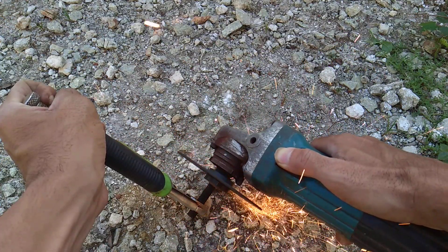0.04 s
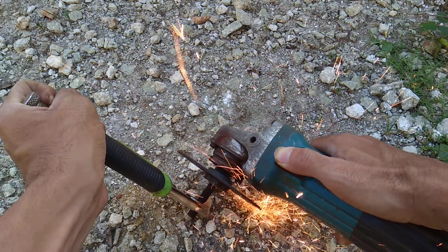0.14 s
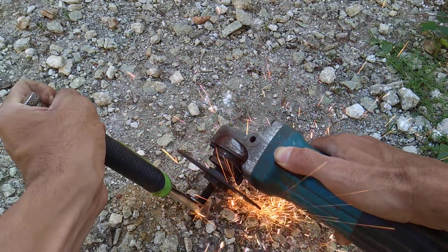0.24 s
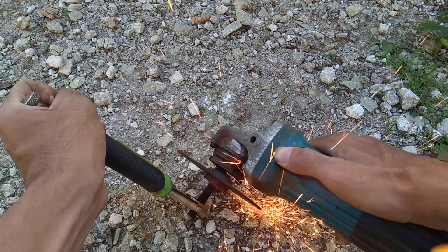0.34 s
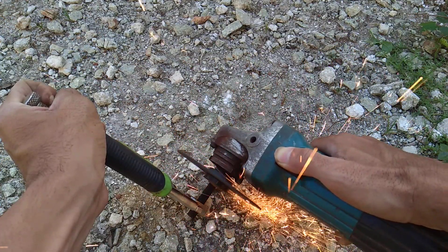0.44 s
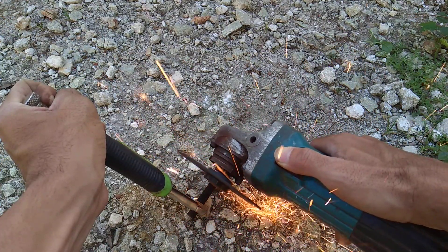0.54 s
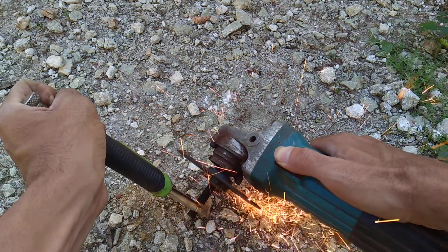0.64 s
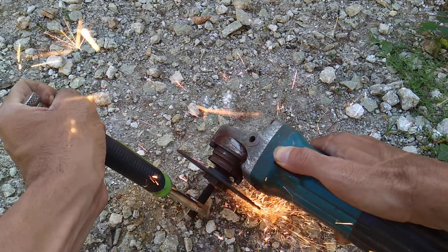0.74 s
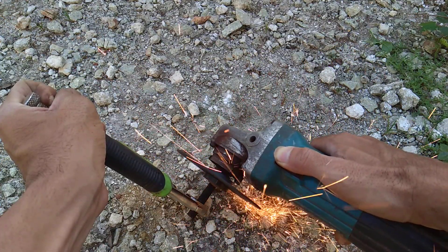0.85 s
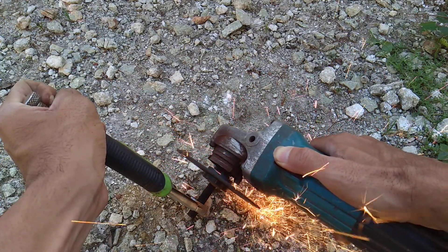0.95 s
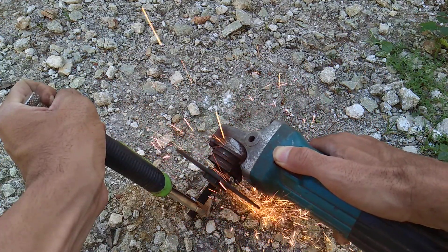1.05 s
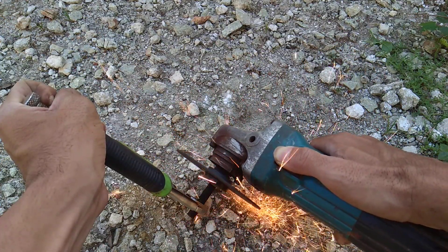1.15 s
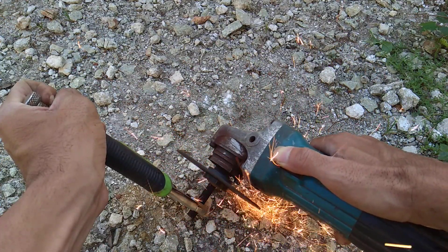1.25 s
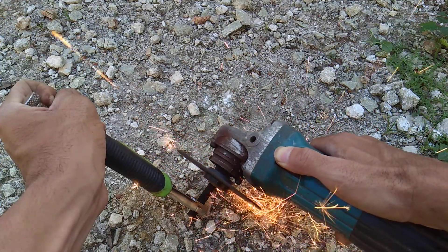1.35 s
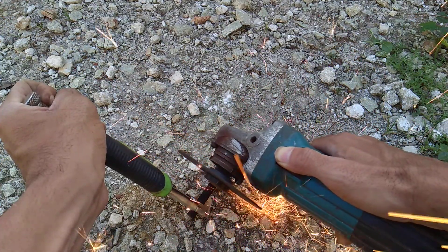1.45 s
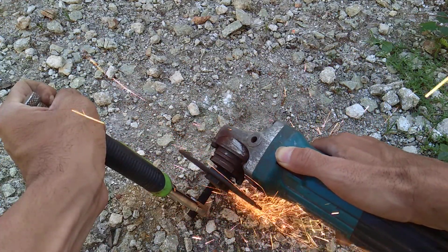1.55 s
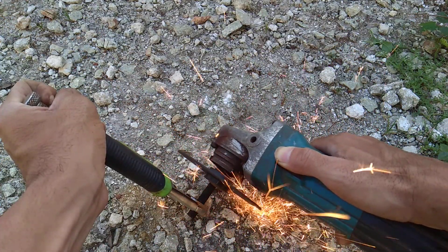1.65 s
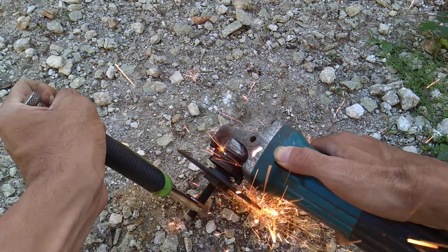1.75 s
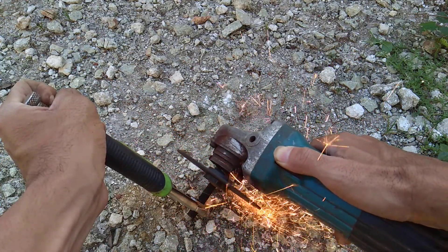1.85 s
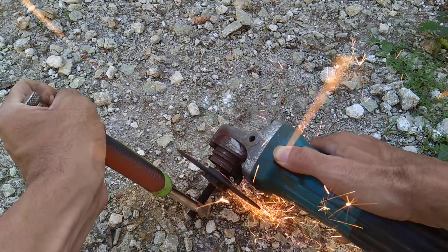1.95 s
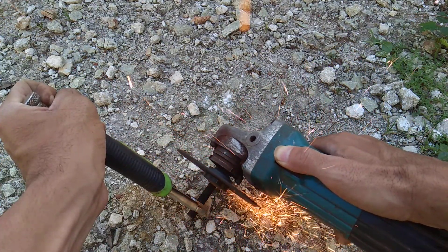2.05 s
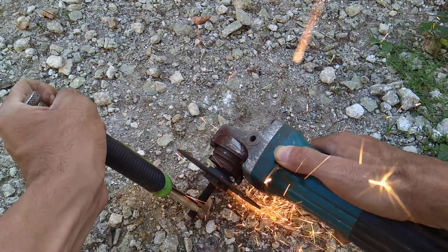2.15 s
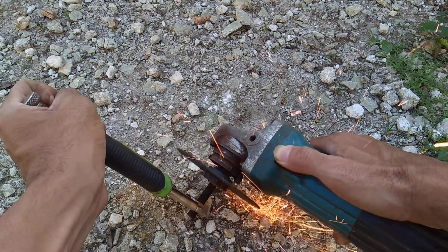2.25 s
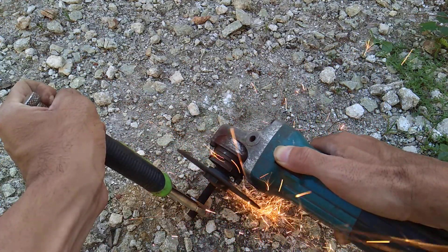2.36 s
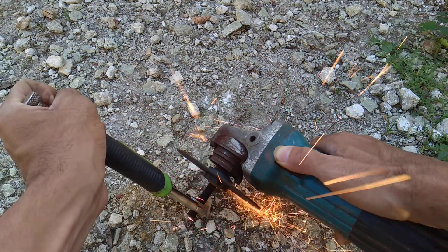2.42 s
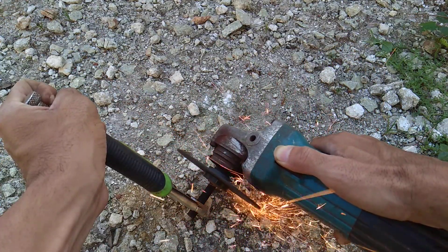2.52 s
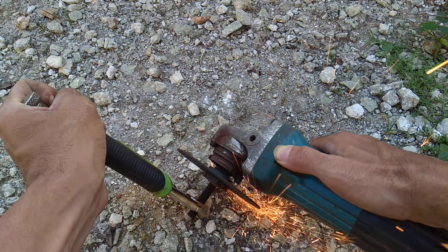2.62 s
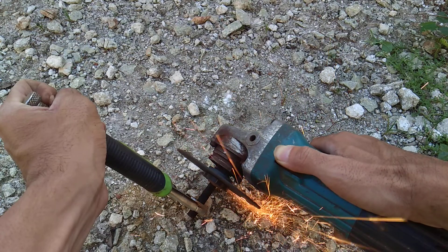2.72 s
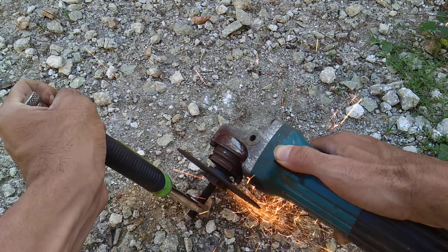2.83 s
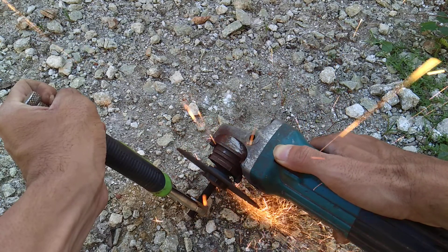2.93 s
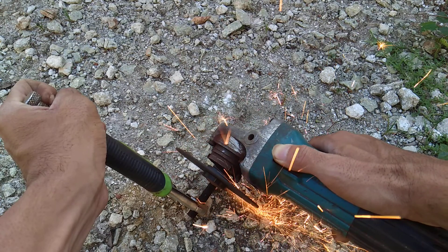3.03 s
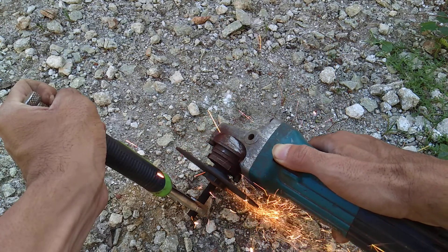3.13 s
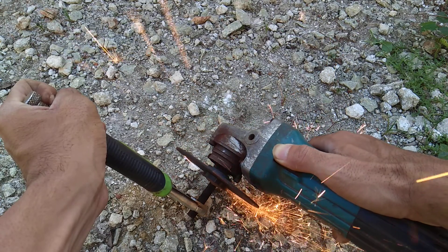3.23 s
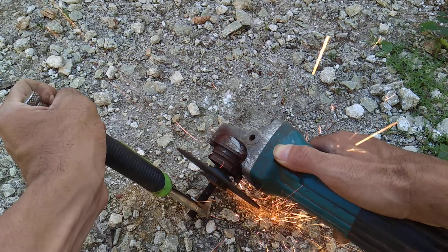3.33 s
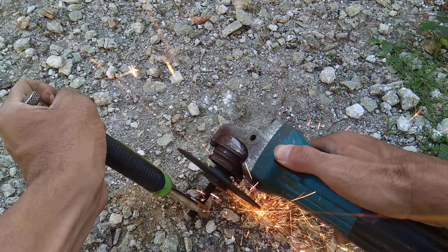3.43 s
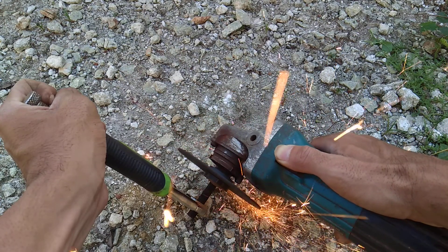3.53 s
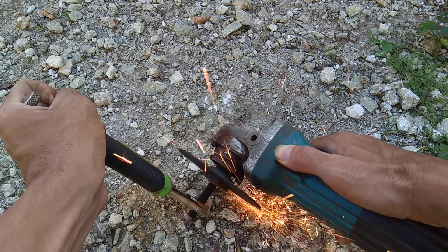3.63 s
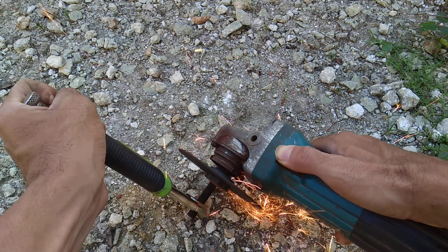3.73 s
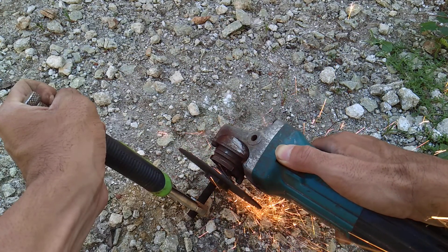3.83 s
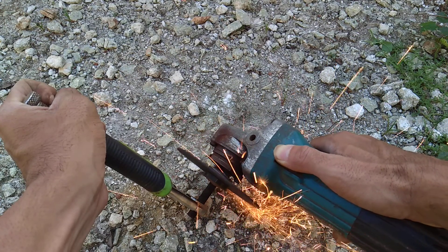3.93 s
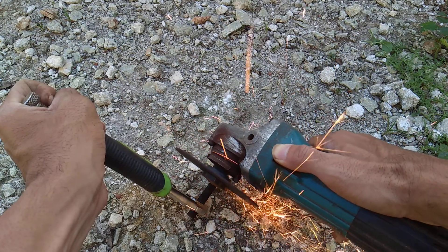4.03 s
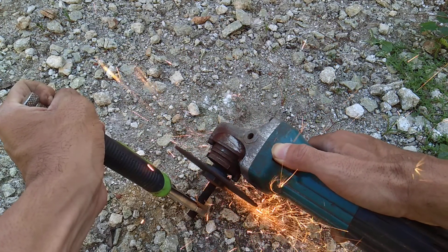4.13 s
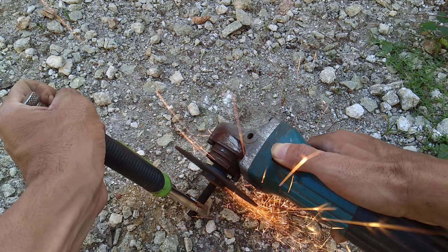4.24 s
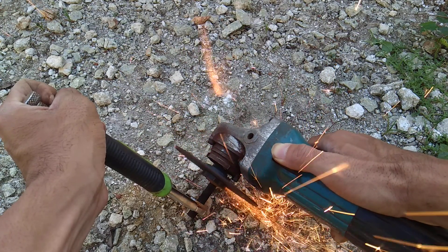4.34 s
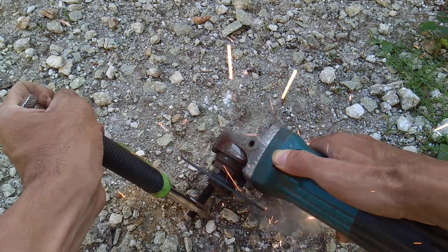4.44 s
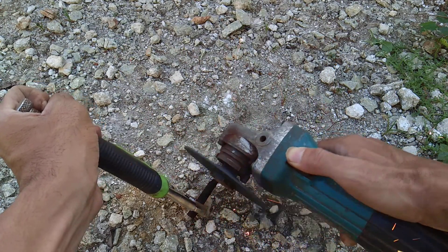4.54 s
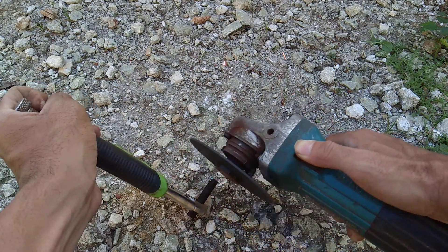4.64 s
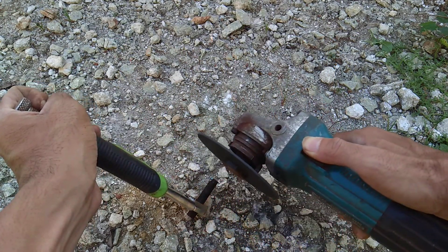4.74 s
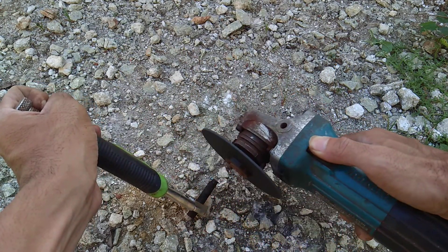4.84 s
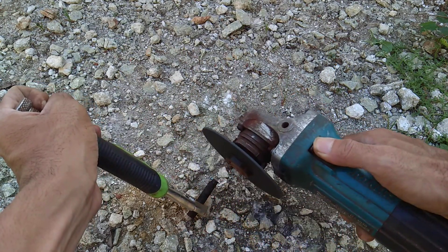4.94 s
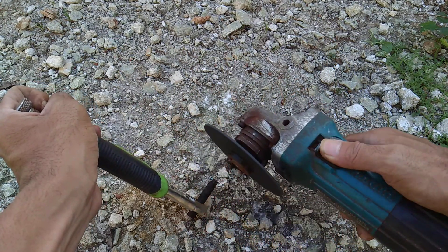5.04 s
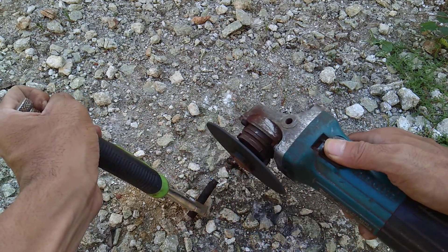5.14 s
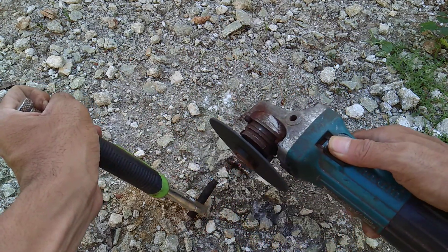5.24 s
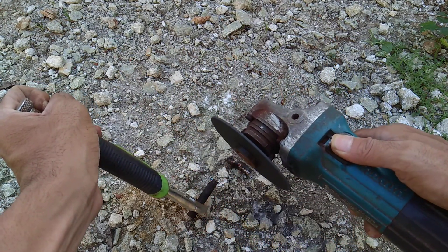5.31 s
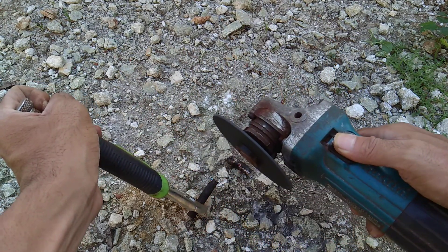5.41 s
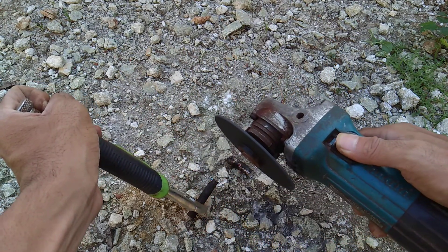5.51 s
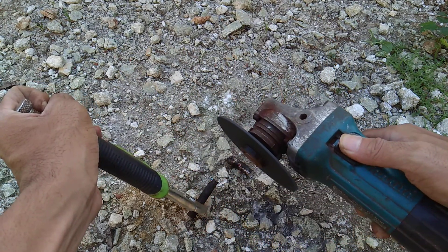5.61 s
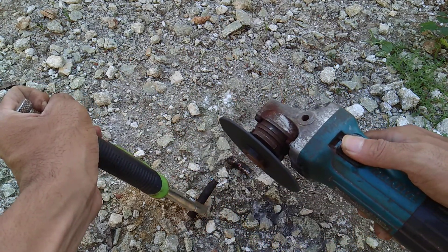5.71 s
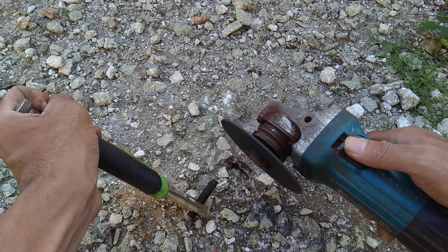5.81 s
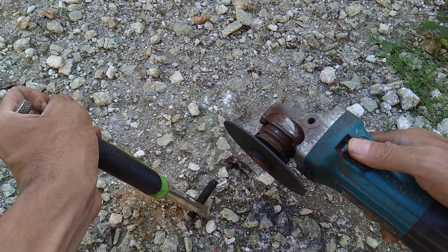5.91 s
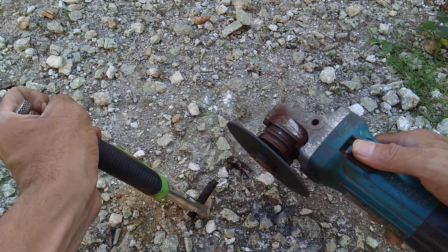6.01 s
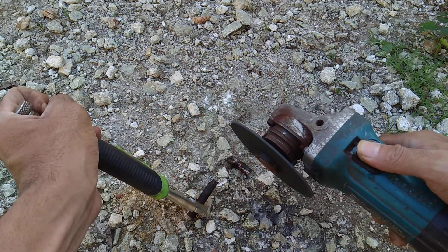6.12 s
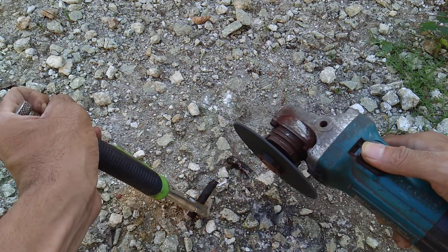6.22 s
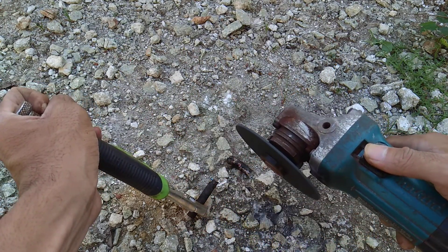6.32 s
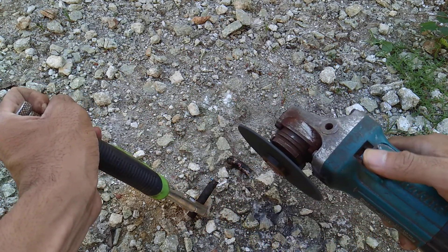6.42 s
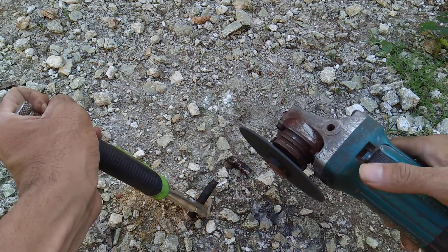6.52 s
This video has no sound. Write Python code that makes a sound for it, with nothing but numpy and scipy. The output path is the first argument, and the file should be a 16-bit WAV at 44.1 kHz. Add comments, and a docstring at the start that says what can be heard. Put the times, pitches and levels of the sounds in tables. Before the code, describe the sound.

An angle grinder cuts a steel nut with harsh, bright, pulsing grinding, then lifts off, races free, and whines down with rattling gears outdoors.

```python
"""An angle grinder cuts a steel nut on a rod, outdoors on gravel: grit strikes ring the rod and wheel and hiss.
The cut pulses with each wheel turn and with the mains; the wheel catches now and then, later skips, then lifts off.
The motor races free, is switched off, and coasts down: fan whine, rotor hum and air rush fall with its speed.
Gear teeth knock and rattle in the coast; the sounds are sines, and noise shaped by filters that ring.
A faint low background runs throughout, and both channels are alike."""
import sys
import numpy as np
from scipy import signal
from scipy.fft import rfft, irfft, next_fast_len
from scipy.io import wavfile
from scipy.ndimage import uniform_filter1d, map_coordinates

SR = 44100
rng = np.random.default_rng(int(sys.argv[2]) if len(sys.argv) > 2 else 0)


def to_wav(sig):
    """Store sig (one row per channel, or 1-D mono) as 16-bit WAV at the path in sys.argv[1].

    Samples outside -1..1 are clipped; the rate is SR.
    """
    pcm = np.clip(np.atleast_2d(sig), -1, 1) * 32767
    pcm = np.round(pcm).astype(np.int16)
    wavfile.write(sys.argv[1], SR, pcm.T)  # frames by channels


N = 289737
T = np.arange(N) / SR  # time of each sample [s]
LIFT_S, OFF_S = 4.475, 5.015  # the wheel leaves the nut; the motor is switched off
WHEEL_RATIO = 10 / 37  # pinion teeth over crown teeth
FAN_BLADES, MOTOR_SLOTS, MAINS_PULSE_HZ = 31, 12, 100

# Steady pressure of the cut: (time [s], ring of the rod [dB], grit hiss [dB])
CUT_LEVELS = [(0, -39.5, -34.5), (.45, -36, -35.5), (.98, -38.5, -36), (1.03, -39, -36), (1.45, -41, -35.5),
              (1.75, -40, -35.5), (2.4, -41.5, -37), (2.9, -40, -36), (3.1, -40.5, -35),
              (3.5, -40.5, -36.5), (3.9, -40.5, -36), (4.3, -41.5, -35.5), (4.39, -39.5, -37.5),
              (4.42, -48, -39), (4.5, -50.5, -43)]
# The wheel digs in for a moment: (time [s], gain of the ring [dB], length [s])
FLARES = [(0.162, 4, 0.029), (.36, 1, 0.0065), (.63, 9, 0.0057), (0.7, 3.5, 0.021), (0.834, 3, 0.036),
          (.925, 6.5, 0.0075), (.938, -1, .003), (1.343, 3.5, 0.015), (1.565, 7, 0.0087),
          (1.615, 3.5, 0.026), (2.538, 9, 0.0047), (3.946, 7, 0.021), (4.362, 6.5, 0.024),
          (4.458, 13.5, 0.013)]
FLARE_HISS, WAVER_DB, WAVER_HZ = 0.29, 1.5, 35.04  # share of flare and waver that reaches the hiss; random waver
# The wheel skips on the nut, about every second turn: (time [s], strength against the steady cut [dB])
BOUNCES = [(3.917, 11), (3.935, 9), (3.947, -8), (3.957, 1), (4.046, 7), (4.06, 2), (4.076, 7), (4.09, 1),
           (4.101, -6), (4.116, 3), (4.14, 7), (4.153, 8), (4.168, 9), (4.188, 1), (4.203, 6), (4.217, 0),
           (4.231, -13), (4.256, 2), (4.269, 2), (4.282, -7), (4.299, 6), (4.313, 8), (4.33, 1), (4.342, 1),
           (4.36, 2), (4.373, 9), (4.386, 6), (4.396, -1), (4.413, 0), (4.429, 10), (4.438, 0), (4.447, 0),
           (4.453, -1), (4.461, 6), (4.476, 0)]
BOUNCE_S, SKIP_FROM_S, SKIP_DB = 0.0019, 4.4, -6  # half length of a bounce; contact slackens between bounces
# Ways the rod, nut and wheel ring: (pitch [Hz], width [Hz], level [dB])
ROD_MODES = [(2543, 190, -11.5), (2735, 86, -0.5), (2789, 75, -0.5), (2960, 240, -3), (3245, 470, -10.5),
             (3902, 145, -6), (4360, 330, -10), (5173, 224, -4), (5566, 165, -7), (6020, 67, -5),
             (6744, 150, -3.5), (7570, 120, -10.5), (7850, 210, -7), (8665, 200, -1.5), (8865, 200, 0),
             (9170, 170, -7.5), (9560, 170, -4), (10350, 130, -7), (10610, 630, -3), (11040, 230, 0.5),
             (12400, 420, -7.5), (13230, 250, -8), (13600, 300, -7.5), (13860, 260, -5), (14330, 260, -7),
             (15400, 500, -9)]
SPLIT_HZ = 3600  # border between the low and the high modes
# Dull ringing of the long rod: (pitch [Hz], width [Hz], level [dB])
HANDLE_MODES = [(1150, 200, -2.5), (1437, 180, -1), (1705, 166, 0), (1987, 150, 0), (2254, 93, -2)]
HANDLE_DB = -16  # level against the hiss
# Colour of the grit hiss: (pitch [Hz], level per Hz [dB])
GRIT_COLOUR = [(200, -19), (700, -15.5), (1500, -13), (2250, -19), (3600, -11), (5500, -4), (9000, -0.5),
               (12000, -6.5), (12750, -7), (13500, -3), (14800, -7), (16000, -9.5)]
# Scars on the wheel face sing at these multiples of the wheel speed: (order [per turn])
SCAR_ORDERS = (19, 20, 21, 24, 26, 28, 30, 36, 38, 53, 65, 79)
# Moments of wear: (time [s])
WEAR_TIMES = (.5, 1.6, 2.6, 3.8)
# One row a scar order, one column a moment of wear: (level against the ring [dB], four times)
SCAR_LEVELS = [(-12.5, -12, -10.5, -12), (-26, -23, -6, -15), (-16, -23, -16, -7.5), (-17, -23, -24, -19),
               (-36.5, -11.5, -33, -35), (-32, -23, -22, -23), (-18, -9.5, -31, -33), (-27, -20, -25, -32),
               (-34, -28, -19, -19), (-29.5, -19, -17, -12), (-29, -15, -7, -13), (-11, -27, -26, -22)]
FACE_DB, FACE_WEAR_HZ = -7, 2.49  # grit pattern that returns every turn, and how fast it wears away
# The cut shakes the tool body: (pitch [Hz], level per Hz [dB])
RUMBLE_COLOUR = [(60, -3), (150, -3), (320, 7), (450, -5), (650, -7), (850, -14)]
RUMBLE_DB = -63
# The wheel catches an edge: (time [s], level before shaping [dB], pitch [Hz], width [Hz], length [s])
SNAGS = [(0.456, -45.5, 1300, 250, 0.034), (1.009, -43, 1470, 300, 0.04), (1.615, -37.5, 1930, 300, 0.013),
         (1.833, -43, 1710, 300, 0.043), (2.394, -47, 990, 200, 0.019), (3.767, -39.5, 1790, 400, 0.031),
         (3.924, -35, 1770, 500, 0.014), (3.93, -51, 507, 200, 0.022), (4.023, -48, 804, 200, 0.021),
         (4.057, -28, 7050, 1400, 0.034), (4.443, -29.5, 5350, 900, 0.014), (4.441, -26, 11250, 600, .009),
         (4.444, -29, 13800, 900, 0.009), (4.44, -30, 7940, 700, 0.0074), (4.441, -52, 120, 200, 0.017),
         (4.455, -50.5, 231, 160, 0.02), (4.56, -63, 80, 60, .04), (4.471, -31, 6000, 5060, 0.005)]
# Single hard grains knock the rod: (time [s], blow [dB])
PINGS = [(.158, 2), (0.628, 3), (.687, 10), (0.9972, 19), (1.056, 1), (3.935, 13)]

# Motor shaft under load, until the hand eases off: (time [s], turns per second [Hz])
LOADED_SPEED = [(0, 489.8), (.55, 491.3), (.75, 489.9), (.9, 490.8), (1.03, 487.7), (1.2, 488.9),
                (1.65, 489.8), (1.95, 493.3), (2.1, 496.5), (2.25, 496.8), (2.55, 502), (2.85, 504.4),
                (3.15, 504.3), (3.6, 506.9), (3.75, 509), (4.44, 513.4)]
FREE_HZ, SPIN_UP_S = 594.7, 0.675  # speed without load, and the time constant towards it
FRICTION_HZ_PER_S, FAN_DRAG = 60.75, 4.972e-4  # coasting loses friction + drag * speed ** 2 each second
# Hum of the unbalanced rotor against shaft speed: (turns per second [Hz], level [dB])
HUM_LEVELS = [(320, -57), (345, -53.5), (372, -48.5), (400, -52), (430, -54), (478, -56), (490, -56),
              (500, -53.5), (509, -53), (518, -62), (560, -60.5)]
# Fan whine against its own pitch: (pitch [Hz], level [dB])
WHINE_LEVELS = [(9800, -60), (10100, -62), (10500, -62), (10800, -64), (11100, -57), (11550, -64),
                (11950, -52), (12250, -62), (12650, -56), (13000, -42), (14000, -47), (14400, -37),
                (14650, -38), (15000, -45.5), (15170, -51), (15400, -54.5), (15600, -63), (15720, -55),
                (15900, -60)]
# Pressing on the nut damps the hum; the whine has its own level: (time [s], hum gain [dB], whine gain [dB])
GRIP = [(0, -8, 2), (.98, -7.5, 2), (1.1, -8, -3), (2.2, -9.5, 0), (3.7, -11, 2), (4.5, -4, 0),
        (5.0, 3.5, 0)]
WHEEL_HUM_DB, SLOT_DB = -75, -52.5  # wheel hum at 520 shaft turns a second; slot tone at full current
# Gear mesh and neighbours of the slot tone: (order [per shaft turn])
SHAFT_ORDERS = 4, 10, 11, 13
# Their levels at full current, one each: (level [dB])
SHAFT_LEVELS = -63.5, -65, -59, -68
# Ways the housing rings: (pitch [Hz], width [Hz], level [dB])
CASE_MODES = [(542, 78, 2.5), (750, 54, -3), (464, 83, -12), (261, 14, -3.5)]
# Tones that ring the housing, wheel orders and their sums with the shaft: (order [per wheel turn])
CASE_ORDERS = (4, 5, 4.7, 2.7)
# Their levels going into the housing, one each: (level [dB])
CASE_LEVELS = (-74, -66, -67, -68.5)
# These tones come and go, one list an order: (time [s], gain [dB], length [s])
CASE_SWELLS = [
    [],
    [(5.62, -6, .04), (5.76, 7, .07), (5.9, -6, .03), (6.0, 1, 0.064), (6.35, -7, .15)],
    [(5.58, 3, 0.028), (5.67, 6, .04), (5.88, 7, .03), (6.3, 10, .11)],
    [(6.15, 7, .12)],
]
# The housing buzzes roughly: (time [s], gain [dB], length [s])
BUZZ_SWELLS = [(5.13, 4.6, 0.032), (5.5, 9, 0.038), (5.58, 10, 0.04), (5.75, 8.9, 0.12), (5.95, 8, .04)]
BUZZ_DB = -70  # before the swells and the gear slack
# Colour of the air rush: (pitch [Hz], level per Hz [dB])
AIR_COLOUR = [(300, -67), (600, -18), (900, -11), (1490, -12), (2090, -9), (2790, -7), (3620, -10),
              (4600, -9), (5200, -4), (6300, -2.5), (7600, -1), (9000, -4), (10000, -4.5), (11500, -5),
              (13400, -7), (14000, -9), (15700, -9.5)]
# The air rush rises and sinks: (time [s], gain [dB])
RUSH_LEVELS = [(4.5, -0.5), (4.75, 1), (4.95, 1.5), (5.15, 0.5), (5.3, -0.5), (5.5, -0.5), (5.7, 0),
               (5.95, 0.5), (6.1, -1), (6.57, -1)]
AIR_TILT_DB = 7  # treble lost per octave of pitch and octave of speed
# The gravel echo lags more as the tool is raised: (time [s], lag [ms])
GROUND_LAG = [(0, .45), (4.5, .455), (4.7, .5), (5.1, .515), (5.7, .53), (6.57, .57)]
GROUND_DB = -13  # echo against the direct sound
# Low gear case modes: (pitch [Hz], width [Hz], level [dB])
GROWL_MODES = [(661, 140, -4), (896, 150, -10.5), (1285, 245, -3), (1489, 230, 1.5)]
# High gear case modes: (pitch [Hz], width [Hz], level [dB])
WHIRR_MODES = [(2260, 420, -17), (2485, 240, -0.5), (2800, 250, -0.5), (3045, 200, -5.5), (3270, 230, -10)]
# The gears swell: (time [s], gain of the growl [dB], gain of the whirr [dB], length [s])
GEAR_SURGES = [(4.53, -1, 4, .03), (4.585, 4, 5, .015), (4.67, 5, 6, 0.025), (4.793, 1, 1, .02),
               (4.848, 4, 2, 0.025), (4.928, 6, 1.5, 0.032), (5.013, 6, -3, 0.025), (5.058, 6, 3, 0.017),
               (5.13, 4.5, 3, 0.03), (5.298, -1.5, 1, 0.081), (5.49, 2, 3, .04), (5.875, 4.5, 4.5, 0.039),
               (5.967, 4, 2, .04)]
GEARS_LOADED_DB = -0.5  # load presses the gears together
# Base level at 550 turns a second, and the power of speed it follows
AIR_DB, AIR_POWER = -36.5, 1.28
GROWL_DB, GROWL_POWER, WHIRR_DB, WHIRR_POWER = -52, 1.7, -48.5, 3
# Gear teeth knock across their slack, the loudest: (time [s], strength [dB], pitch it favours [Hz])
KNOCKS = [(4.644, -22, 3000), (4.838, -24, 1450), (4.909, -25, 1500), (5.054, -21, 1400),
          (5.1154, -29, 2406), (5.3654, -26, 2400), (5.496, -22, 2900), (5.5214, -23, 2900),
          (5.5764, -28, 5000), (5.72, -29, 900), (5.8655, -23.5, 1400), (5.942, -32, 1600),
          (5.9574, -26, 7500), (5.97, -22.5, 750), (6.1404, -26, 3200), (6.149, -27, 8000),
          (6.1964, -33, 5000), (6.244, -30.5, 2500), (6.257, -25, 5000), (6.268, -22, 2160),
          (6.351, -33, 2500), (6.392, -33, 2600), (6.41, -27, 3600), (6.4348, -23.5, 2900),
          (6.4597, -22.5, 2500), (6.4674, -27, 4970), (6.49, -30, 3000), (6.509, -31, 2800),
          (6.5345, -27, 2600), (6.544, -28, 3000), (6.546, -31, 9500), (6.552, -31, 8000)]
KNOCK_FALL_DB = 12.5  # lost per octave away from the favoured pitch
RATTLE_FROM_S, RATTLE_DB, RATTLE_SCATTER_DB = 5.9, -35, 3  # fainter random knocks, scattered up and down
# Ways the gearbox rings: (pitch [Hz], width [Hz], level [dB])
GEARBOX_MODES = [(780, 93, -6), (1470, 140, -6), (2270, 280, -3), (2900, 290, -3.5), (3600, 770, -6),
                 (5400, 1700, -4), (8000, 870, 1.5), (9500, 1800, 2)]

# Colour of the outdoor background: (pitch [Hz], level per Hz [dB])
OUTDOORS_COLOUR = [(20, -11), (60, -9), (120, -10.5), (200, -15.5), (290, -9.5), (400, -2.5), (800, -49),
                   (2000, -48)]
OUTDOORS_DB = -67.5
TOP_HZ = 15755  # where the treble ends


def grinding(wheel):
    """The cut: grit strikes, stronger or weaker with the contact, ring the rod and wheel and hiss."""
    ring_db, hiss_db = contact()
    touch = np.clip((LIFT_S - T) / 0.012, 0, 1)
    drive = strike_strength(wheel)
    low_modes = [mode for mode in ROD_MODES if mode[0] < SPLIT_HZ]
    high_modes = [mode for mode in ROD_MODES if mode[0] >= SPLIT_HZ]

    low_ring = patchy(drive, low_modes, patchy_db=2.0, rate=34)
    low_ring = low_ring + scars(wheel) * np.sqrt(drive)

    hiss = patchy(drive, high_modes, patchy_db=2.2, rate=25)
    hiss += level(colour(grains(1.9) * drive, GRIT_COLOUR), -3.0)
    hiss += undb(HANDLE_DB) * patchy(drive, HANDLE_MODES, patchy_db=3.5, rate=22)
    hiss += level(ring(face(wheel) * np.sqrt(drive), ROD_MODES), FACE_DB)

    rumble = level(colour(grains(0.64), RUMBLE_COLOUR), RUMBLE_DB)
    return touch * (undb(ring_db) * low_ring + undb(hiss_db) * hiss + rumble)


def contact():
    """Pressing harder makes ring and hiss louder: steady pressure, brief flares and a random waver."""
    ring_db, hiss_db = curves(CUT_LEVELS)
    flare_db = swells(FLARES) + WAVER_DB * walk(WAVER_HZ)
    return ring_db + flare_db, hiss_db + FLARE_HISS * flare_db + 0.69 * walk(30.2)


def strike_strength(wheel):
    """An untrue wheel and the mains pulse in the motor press the grit in a rhythm; bites and bounces add bursts."""
    pulse_db = 3.0 * np.cos(2 * np.pi * wheel + 0.27) + 2.0 * np.cos(4 * np.pi * wheel + 2.63)
    pulse_db += 2.6 * np.cos(2 * np.pi * MAINS_PULSE_HZ * T + 0.68)
    # coarse grains bite at random, about 140 a second: sudden start, 1 ms fade
    hits = (rng.random(N) < 140 / SR) * rng.exponential(size=N)
    bites = signal.lfilter([1], [1, -np.exp(-1 / (0.001 * SR))], hits)
    steady = undb(pulse_db + 0.92 * walk(54)) * (1 + 0.66 * bites)
    drive = steady * undb(SKIP_DB * (T > SKIP_FROM_S)) + bounces()
    # bouncing bunches the strikes, it adds no power
    return drive / np.sqrt(uniform_filter1d(drive ** 2, size=2000))


def bounces():
    """A skipping wheel touches in short rounded bursts, one a bounce."""
    return sum(undb(db) * np.exp(-((T - s) / BOUNCE_S) ** 2) for s, db in BOUNCES)


def scars(wheel):
    """Scars on the wheel face sing at whole multiples of its speed, and change level as they wear."""
    jitter = 0.1 * walk(40.0)  # [turns], shared by all the tones
    out = 0
    for order, levels in zip(SCAR_ORDERS, SCAR_LEVELS):
        worn_db = np.interp(T, WEAR_TIMES, levels)
        out = out + tone(order * wheel + jitter, worn_db + 2.7 * walk(25.1))
    return out


def face(wheel):
    """Grit pattern that comes round every turn and slowly wears into a new one."""
    pattern = rng.standard_normal((40, 300))  # rows: states of wear; columns: places round the wheel
    place = wheel % 1 * pattern.shape[1]
    return map_coordinates(pattern, [FACE_WEAR_HZ * T, place], order=1, mode="grid-wrap")


def snags():
    """Short scraping noise bursts where the wheel catches, and hard knocks that ping one main rod mode."""
    out, blows = np.zeros(N), np.zeros(N)
    for s, db, hz, width, length in SNAGS:
        age = np.maximum(T - s, 0) / length
        scrape = level(ring(rng.standard_normal(N), [(hz, width, 0)]), db - 3.0)
        out += age * np.exp(1 - age ** 2) * scrape
    for s, db in PINGS:
        blows[int(s * SR)] = undb(db)
    hz, width, _ = ROD_MODES[2]
    main = [(hz, 2.7 * width, 0)]
    return out + ring(ring(blows, main), main)


def speed():
    """Shaft speed: held down by the cut, racing towards its free speed, then braked by friction and the fan."""
    eased_s, eased_hz = LOADED_SPEED[-1]
    racing_s = np.minimum(T, OFF_S) - eased_s
    racing = FREE_HZ - (FREE_HZ - eased_hz) * np.exp(-racing_s / SPIN_UP_S)
    even = np.sqrt(FRICTION_HZ_PER_S / FAN_DRAG)  # speed at which both losses are equal
    coast_s = np.maximum(T - OFF_S, 0)
    free = even * np.tan(np.arctan(racing / even) - even * FAN_DRAG * coast_s)
    return np.where(T < eased_s, curves(LOADED_SPEED)[0], free)


def motor(hz, shaft, wheel):
    """The running tool: turning parts give tones and hum, the housing rings, air rushes and gears whirr."""
    return motor_tones(hz, shaft, wheel) + housing(wheel) + air_rush(hz) + gears(hz)


def motor_tones(hz, shaft, wheel):
    """Each turning part sings at its own multiple of the speed; slot and gear tones also need motor current."""
    hum_gain, whine_gain = curves(GRIP)
    hum_db = by_pitch(hz, HUM_LEVELS) + hum_gain
    whine_db = by_pitch(FAN_BLADES * hz, WHINE_LEVELS) + whine_gain
    current = np.interp(T, [LIFT_S, LIFT_S + .1, OFF_S, OFF_S + .02], [1, .3, .3, 0])  # share of full

    out = tone(shaft + 0.055 * walk(70), hum_db + 1.4 * walk(30))
    out += tone(FAN_BLADES * shaft, whine_db + 3.1 * walk(60))
    out += current * tone(MOTOR_SLOTS * shaft, SLOT_DB + 1.7 * walk(15))
    for order, db in zip(SHAFT_ORDERS, SHAFT_LEVELS):
        out += current * tone(order * shaft, db + 3.2 * walk(11.3))
    return out + tone(wheel, WHEEL_HUM_DB + 2.0 * walk(6.14)) * (hz / 520) ** 3


def housing(wheel):
    """Wobbling gears ring the housing and make it buzz; load presses them together and mutes the wobble."""
    slack = np.interp(T, [LIFT_S, OFF_S], [.15, 1])
    wobble = 0
    for order, db, surges in zip(CASE_ORDERS, CASE_LEVELS, CASE_SWELLS):
        wobble = wobble + tone(order * wheel + 0.15 * walk(50), db + swells(surges) + 3.0 * walk(30))
    buzz = patchy(undb(2.0 * walk(53)), CASE_MODES[:3], patchy_db=1.0, rate=23)
    return slack * (ring(wobble, CASE_MODES) + undb(BUZZ_DB + swells(BUZZ_SWELLS)) * buzz)


def air_rush(hz):
    """Fan air is coloured noise, quieter and duller as the speed falls, with an echo off the gravel."""
    air = level(colour(grains(1.46) * undb(0.6 * walk(50)), AIR_COLOUR), 0)
    rush = 0
    for octave in range(-5, 2):  # bands an octave wide, counted from 8 kHz
        edges = np.minimum(8000 * 2. ** (octave + np.array([-.5, .5])), .49 * SR)
        sos = signal.butter(2, edges, "band", fs=SR, output="sos")
        band = signal.sosfiltfilt(sos, air, padtype="even")
        tilt_db = AIR_TILT_DB * max(octave + 1, 0) * np.log2(hz / 550)
        rush = rush + band * undb(tilt_db + 0.36 * walk(5.3))
    return ground(rush) * undb(AIR_DB + curves(RUSH_LEVELS)[0]) * (hz / 550) ** AIR_POWER


def ground(x):
    """Sound that bounces off the gravel arrives a little later and fainter than the direct sound."""
    lag = curves(GROUND_LAG)[0] * SR / 1000  # [samples]
    return x + undb(GROUND_DB) * map_coordinates(x, [np.arange(N) - lag], order=3)


def gears(hz):
    """Rough gear contact rings the gear case: a low growl and a high whirr that grow with speed."""
    loaded_db, rough = GEARS_LOADED_DB * (T < LIFT_S), undb(2.0 * walk(80))
    growl_db = GROWL_DB + loaded_db + swells([(s, db, length) for s, db, _, length in GEAR_SURGES])
    whirr_db = WHIRR_DB + loaded_db + swells([(s, db, length) for s, _, db, length in GEAR_SURGES])
    growl = undb(growl_db) * (hz / 550) ** GROWL_POWER * patchy(rough, GROWL_MODES, patchy_db=3.5, rate=17)
    whirr = undb(whirr_db) * (hz / 550) ** WHIRR_POWER * patchy(rough, WHIRR_MODES, patchy_db=4.0, rate=22)
    return growl + whirr


def knocks():
    """Each tooth knock is a noise puff of a few milliseconds in the gearbox modes, strongest near its pitch."""
    rows = list(KNOCKS)
    for when, strength, pitch in rng.random((16, 3)):
        s = RATTLE_FROM_S + (T[-1] - RATTLE_FROM_S) * np.sqrt(when)  # denser as the wheel slows
        rows.append((s, RATTLE_DB + 2 * RATTLE_SCATTER_DB * (strength - .5), 2000 * 4 ** pitch))
    out = 0
    for hz, width, mode_db in GEARBOX_MODES:
        events = [(s, undb(db - KNOCK_FALL_DB * abs(np.log2(hz / pitch)))) for s, db, pitch in rows]
        noise = level(ring(rng.standard_normal(N), [(hz, width, 0)]), mode_db - 13.0)
        out = out + puffs(events, 0.00078) * noise
    return out


def outdoors():
    """The faint low background is steady noise with most of its strength in the bass."""
    return level(colour(rng.standard_normal(N), OUTDOORS_COLOUR), OUTDOORS_DB)


def patchy(drive, modes, patchy_db, rate):
    """Each mode rings on its own random grains, so each swells and fades in its own time."""
    out = 0
    for hz, width, db in modes:
        strikes = drive * grains(1.0) * undb(patchy_db * walk(rate))
        # two passes make steep sides but narrow the peak, so each is wider
        once = ring(strikes, [(hz, 1.55 * width, 0)])
        twice = ring(once, [(hz, 1.63 * width, 0)])
        out = out + level(twice, db + 10 * np.log10(width))  # table level is per Hz
    return level(out, 0)


def ring(x, modes):
    """Struck solids ring at their own pitches: side-by-side two-pole filters with alternate signs."""
    out = 0
    for k, (hz, width, db) in enumerate(modes):
        b, a = signal.iirpeak(hz, hz / width, fs=SR)
        out = out + (-1) ** k * undb(db) * signal.lfilter(b, a, x)
    return out


def grains(scatter_db):
    """One random strike a sample, a few much harder than the rest."""
    return rng.standard_normal(N) * undb(scatter_db * rng.exponential(size=N))


def colour(x, points):
    """Shapes a sound's spectrum by (pitch [Hz], level [dB]) points, joined by lines over log pitch."""
    hz, db = np.transpose(points)
    size = next_fast_len(len(x))
    bins = np.maximum(np.arange(size // 2 + 1) * SR / size, 1)
    gain = undb(np.interp(np.log(bins), np.log(hz), db, left=-90))
    return irfft(rfft(x, size) * gain, size)[:len(x)]


def tone(turns, db):
    """A sine, one cycle a turn, with db as its RMS level."""
    return np.sqrt(2) * undb(db) * np.sin(2 * np.pi * turns)


def walk(rate):
    """A random wander around zero: values held 1 / rate seconds and smoothed twice."""
    k = int(SR / rate)
    steps = np.repeat(rng.standard_normal(N // k + 1), k)
    return uniform_filter1d(uniform_filter1d(steps, k), k)[:N]


def swells(events):
    """Bell-shaped gains in dB."""
    return sum(db * np.exp(-((T - s) / length) ** 2) for s, db, length in events)


def puffs(events, rise_s):
    """Envelope of quick swells that die a little slower than they rise."""
    out, pole = np.zeros(N), np.exp(-1 / (rise_s * SR))
    for s, gain in events:
        out[min(int(s * SR), N - 1)] += gain
    return signal.lfilter([np.e / (rise_s * SR)], [1, -2 * pole, pole ** 2], out)


def curves(table):
    """Table columns joined by straight lines in time."""
    s, *columns = np.transpose(table)
    return [np.interp(T, s, column) for column in columns]


def by_pitch(hz, points):
    """Level read off a table of (pitch [Hz], level [dB]) points."""
    return np.interp(hz, *np.transpose(points))


def undb(db):
    """Turns dB into a plain factor."""
    return 10 ** (np.asarray(db) / 20)


def level(x, db):
    """Scales a sound to an RMS level in dB."""
    return x * undb(db) / np.sqrt(np.mean(x ** 2))


def scene():
    """Adds all sources, with motor and wheel turning from one shared speed."""
    hz = speed()
    shaft = np.cumsum(hz) / SR  # turns so far
    wheel = WHEEL_RATIO * shaft
    mono = grinding(wheel) + snags() + motor(hz, shaft, wheel) + knocks() + outdoors()
    return np.array([mono, mono])


def record(dry):
    """A steep low-pass filter cuts the top of the treble."""
    return signal.sosfilt(signal.ellip(16, .3, 75, TOP_HZ, fs=SR, output="sos"), dry)


dry = scene()
out = record(dry)
to_wav(out)
```